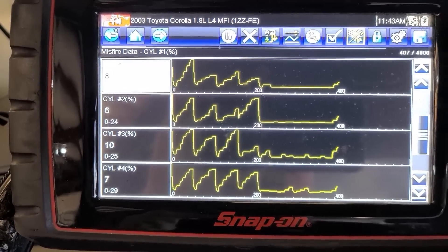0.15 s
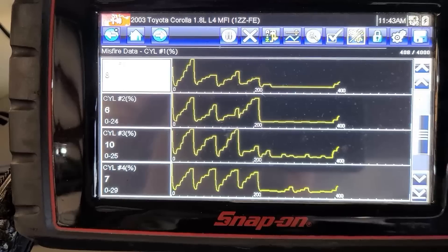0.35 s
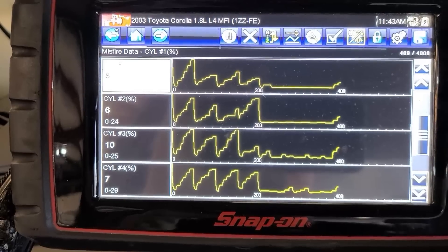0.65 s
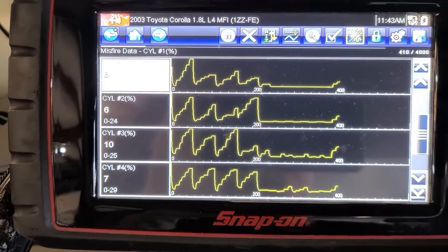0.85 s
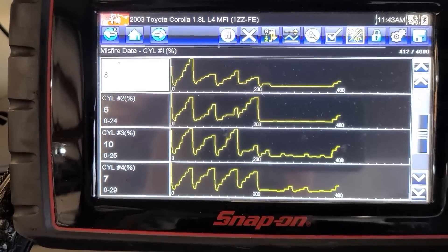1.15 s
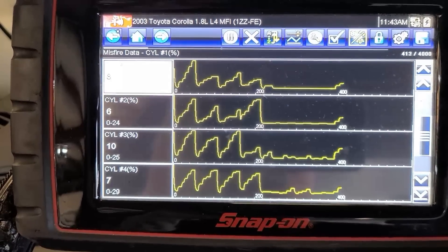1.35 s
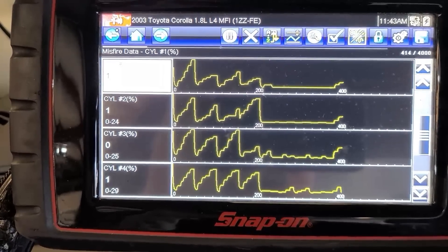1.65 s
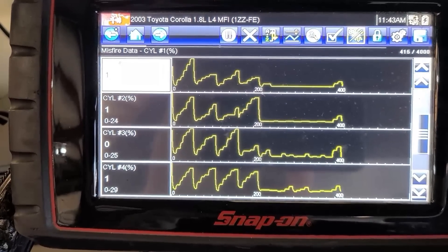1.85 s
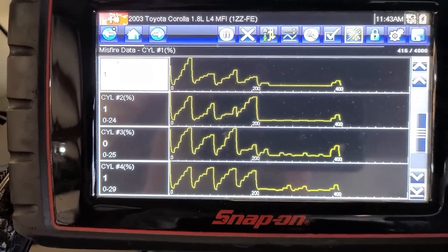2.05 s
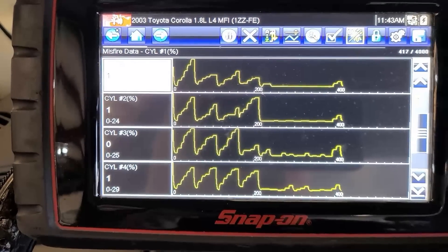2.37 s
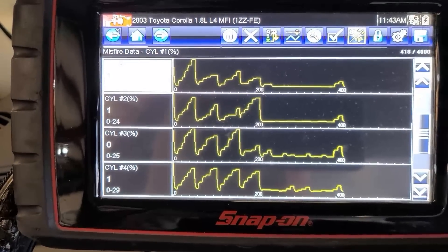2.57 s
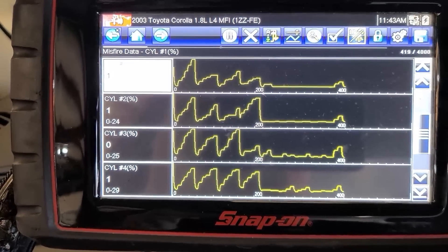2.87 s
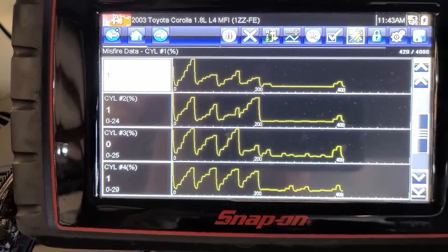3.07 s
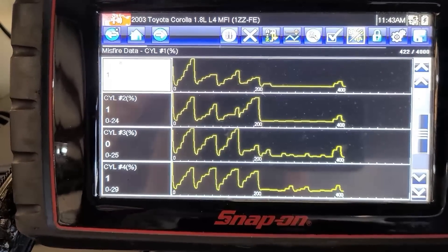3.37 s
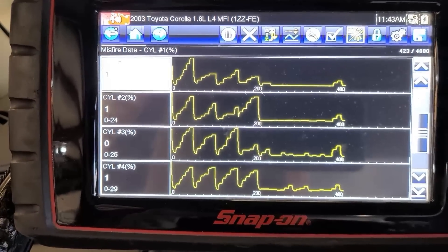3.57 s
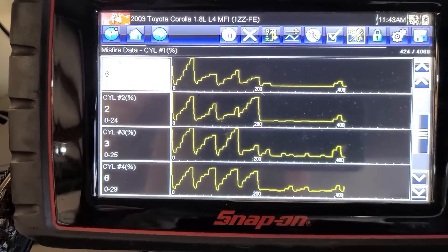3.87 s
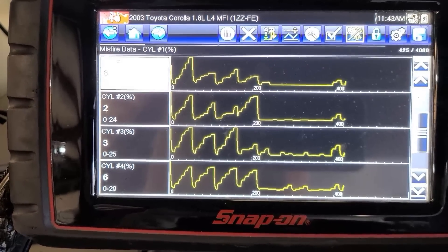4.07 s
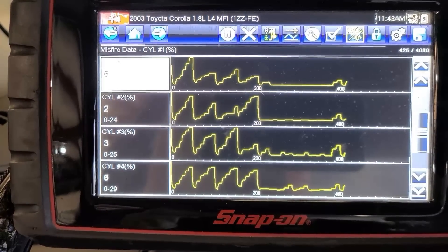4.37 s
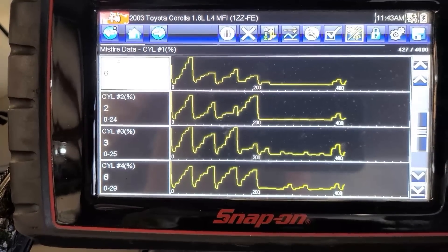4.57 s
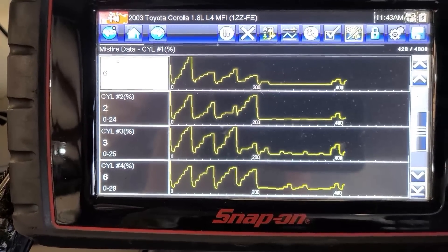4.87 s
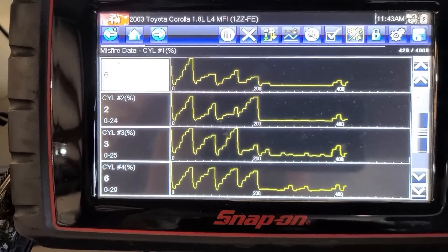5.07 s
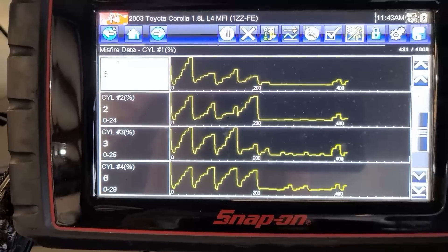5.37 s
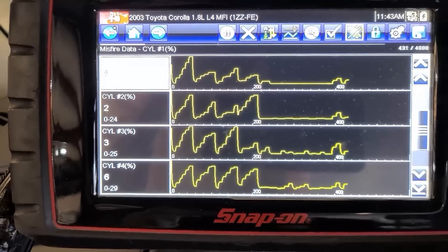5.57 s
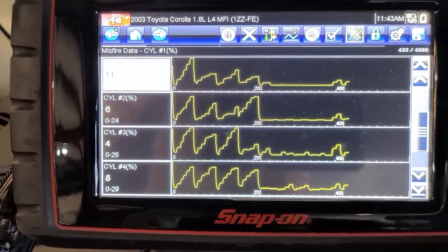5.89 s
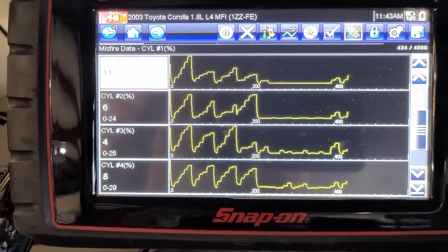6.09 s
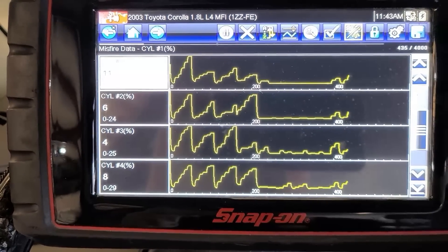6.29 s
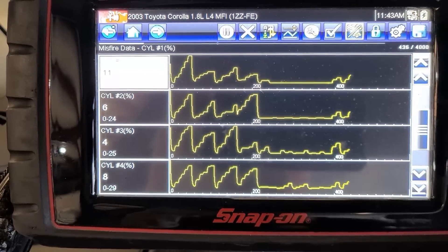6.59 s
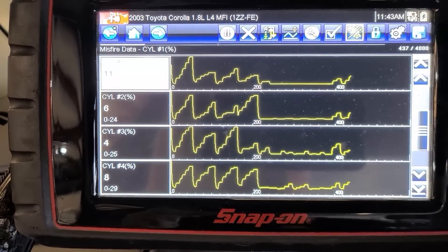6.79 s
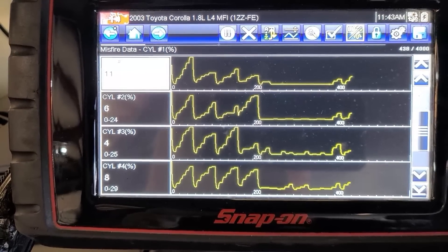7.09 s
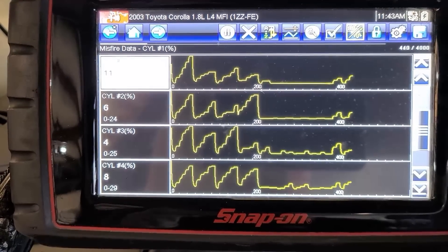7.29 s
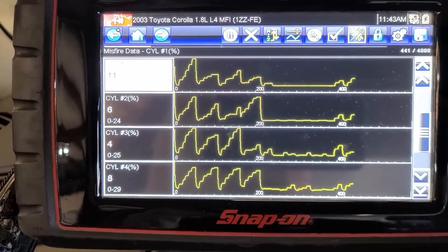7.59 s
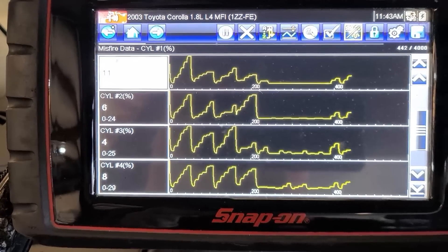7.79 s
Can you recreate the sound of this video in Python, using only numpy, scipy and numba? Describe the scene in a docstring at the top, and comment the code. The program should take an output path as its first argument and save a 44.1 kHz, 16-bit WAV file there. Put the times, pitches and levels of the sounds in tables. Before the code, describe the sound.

A four-cylinder car engine lopes at a low, rough idle, close by in a workshop, its uneven throb lying under a steady mechanical rush. A light knock and a brief scuff sound nearby. After a soft thud and a few pedal clicks, the engine revs up with a booming growl and intake hiss, sinks partway, and is revved again just after another thud.

```python
"""An engine idling and revved

A four-cylinder car engine lopes at a rough idle, close by in a workshop, and is then revved twice.
Periodic firing gives a booming note, and its uneven pulses excite the resonances of body and exhaust.
Valve gear and intake add broadband noise; a knock, a scuff, two thuds and pedal clicks sound nearby.
Of two microphone ports a hand apart, the left hears the treble first."""
import sys
import numpy as np
from scipy import signal
from scipy.fft import rfft, irfft
from scipy.io import wavfile
from scipy.ndimage import uniform_filter1d
from numba import njit

SR = 44100
rng = np.random.default_rng(int(sys.argv[2]) if len(sys.argv) > 2 else 0)


def to_wav(s):
    """Save 16-bit WAV."""
    ch = np.atleast_2d(s).T  # columns
    pcm = np.round(np.clip(ch, -1, 1) * 32767)  # PCM
    wavfile.write(sys.argv[1], SR, pcm.astype(np.int16))


N = 350154

# Noise spectra. Each row: frequency in Hz, relative spectral density in dB.
IDLE_SPECTRUM = [(24, -59.5), (40, 0), (60, -2), (91, -16.5), (151, -23), (203, -21), (319, -39),
                 (361, -33.5), (389, -36), (611, -39), (1390, -47), (2540, -45.5), (4510, -60),
                 (6730, -69.5), (9000, -68), (12000, -65), (14500, -74), (15800, -75)]
GEAR_SPECTRUM = [(530, -33), (900, -7), (1120, -3), (1420, -1), (2240, -3.5), (2460, 0), (5240, -22),
                 (6570, -33.5), (7500, -38.5), (11500, -31.5), (15800, -66)]
GROWL_SPECTRUM = [(60, -48), (110, -16), (210, 6.5), (260, -2), (566, -5), (780, -6), (1100, -11.5),
                  (1500, -47)]
HISS_SPECTRUM = [(4120, -5), (7000, -5), (7370, -3), (9250, -12), (12300, -1), (15000, -9), (15800, -18)]
PLATE_SPECTRUM = [(1500, -35), (2850, -6), (3300, -5), (3800, -10), (5200, -19), (6500, -11), (7600, -20.5),
                  (15000, -29)]  # air past the throttle plate
# Resonances. Each row: centre in Hz, width in Hz, gain in dB.
BAY_MODES = [(422, 12, 1.5), (516, 6.8, 3.5), (550, 12, -7.5), (764, 11, 8), (832, 7.5, 8), (1124, 33, 4),
             (1230, 207, 7.5), (1428, 14, 3.5), (1590, 80, 2), (1755, 17, 10), (1970, 4.7, 9),
             (2100, 8, 9.5), (2457, 23, 3.5), (4020, 28, 6.5), (6490, 2680, 15)]  # panels of the engine bay
WHIRR_MODES = [(64.7, 3.5, -1), (140.5, 20, 5.5), (1590, 130, 5), (2690, 39, 8.5), (3280, 1120, 5.5)]  # in the idle noise alone
PANEL_MODES = [(605, 480, 16), (843.4, 120, -3), (1140, 140, 9), (1430, 340, 8), (1700, 220, 5),
               (2600, 3100, -10)]
FLOOR_MODES = [(133, 39, 3), (242, 6.6, 10), (289, 41, 6), (363, 44, 1.5), (535, 450, -7.5),
               (950, 480, -14.5), (1400, 640, -19)]
PEDAL_MODES = [(800, 500, 5.5), (1450, 560, 17.5), (1860, 400, -3), (2700, 800, 6), (4380, 2000, -22),
               (6800, 2100, -7), (10800, 6800, -43)]
SCUFF_MODES = [(340, 70, -2), (557, 500, 1.5), (1168, 83, 5.5), (1410, 260, -1.5), (2380, 2300, -13),
               (10200, 2643, -36)]
BODY_MODES = [(55.2, 27, 6), (75.6, 54, 1.5), (103.6, 34, 9.5), (145.9, 15.7, 9), (180, 29, -2),
              (200.5, 32, -1.5), (281.8, 44, 0), (383.4, 13, -17.5), (430.7, 32, -14.5), (578, 73, -11)]  # body and exhaust
# Pitches that the room swallows. Each row: centre in Hz, width in Hz, gain in dB.
ROOM_NULLS = [(51.8, 6, -8), (64.6, 3.8, -6), (89.4, 5.3, -10), (105.6, 2.8, -7.5), (115.2, 2.75, -8.5)]
# Impacts. Each row: start in seconds, peak level in dB, seconds for the rattle to fall 60 dB.
KNOCKS = [(.932, -34.5, 0.47), (.951, -38.5, 0.43), (.962, -42, 0.45)]
THUDS = [(5.49, -26.5, 0.23), (7.215, -25, 0.17)]
PEDAL_CLICKS = [(5.532, -33.5, 0.028), (5.6171, -31, 0.024), (5.622, -29.5, 0.04), (5.678, -26, 0.038),
                (5.6847, -29.5, 0.066)]
# Strokes of a rub. Each row: start in seconds, level in dB.
SCUFF_STROKES = [(2.615, -36.5), (2.686, -40.5)]
# Throttle blips. Each row: opening time, time taken to open and shutting time, all in seconds.
BLIPS = [(5.64, 0.46, 6.2), (7.24, 0.18, 7.6)]
# Course of the engine. Each row: time in seconds, firing rate in Hz, base levels of note and ring in dB.
ENGINE_COURSE = [(0.0, 30.61, -29, -51), (2.1, 30.45, -35, -50.5), (2.4, 29.51, -32.5, -49.5),
                 (5.4, 29.23, -32, -52), (5.66, 32.94, -49, -36.5), (5.69, 35.5, -19.5, -32.5),
                 (5.77, 43.03, -16.5, -33), (5.86, 51.15, -24.5, -30.5), (5.97, 65.97, -24.5, -29),
                 (6.04, 74.88, -16, -27.5), (6.12, 92.2, -26, -21), (6.23, 112.9, -13.5, -26),
                 (6.35, 125.4, -13, -30), (6.46, 119.5, -15, -27), (6.55, 122, -17, -22.5),
                 (6.72, 108.9, -12.5, -31), (6.96, 88.65, -17, -26), (7.28, 66.44, -14.5, -33.5),
                 (7.38, 81.9, -18.5, -25.5), (7.5, 101.4, -17, -23), (7.65, 122.9, -11.5, -28),
                 (7.74, 121, -13, -25), (7.85, 113.1, -12.5, -21.5), (7.94, 110.6, -23.5, -28)]
# Surges of strong firings at idle. Each row: middle in seconds, level in dB, half width in seconds.
SURGES = [(.06, -27, 0.063), (.37, -31.5, 0.083), (0.669, -28, 0.039), (0.979, -29.5, 0.094),
          (1.3, -28, 0.062), (1.59, -26.5, 0.042), (1.88, -25.5, 0.046), (2.08, -35, 0.031),
          (2.208, -25, .045), (2.5, -28.5, 0.021), (2.8, -30.5, 0.055), (2.961, -34, 0.035),
          (3.13, -30.5, 0.065), (3.46, -30.5, .05), (3.8, -29.5, 0.055), (4.07, -30.5, 0.062),
          (4.3, -35, 0.02), (4.43, -31.5, 0.037), (4.671, -29, 0.056), (4.95, -34, 0.034), (5.06, -28, .04),
          (5.26, -37, 0.027), (5.39, -29, 0.05), (5.57, -29.5, 0.024)]
# Firing strength round the cycle. Each entry: one cylinder's offset in dB, before scaling by roughness.
CYLINDER_BALANCE = [-3.5, -3.5, -3, -8]
# The two ports. Each row: frequency in Hz, coherence from 0 to 1, left minus right level in dB.
PORT_RESPONSE = [(29.3, 0.98, -1.5), (60, 0.97, -0.5), (130, 0.98, -1.5), (292, 0.87, -1), (594, 0.52, -.4),
                 (970, 0.61, 1), (2000, 0.29, 3.5), (4000, 0.14, -0.2), (7000, 0.37, 3), (12000, 0.8, .5)]

# Noise laws: dB at FULL_HZ with the throttle shut, dB per octave of speed, dB per unit of opening.
GEAR_LAW, GROWL_LAW = (-29, 12.8, 1.76), (-33, 9.3, 4.6)
HISS_LAW, PLATE_LAW = (-67, 5.6, 20.7), (-49.5, 2.5, 9.8)
FULL_HZ = 120  # firing rate near the top of a rev
TIME, BIN_HZ = np.arange(N) / SR, np.arange(N // 2 + 1) * SR / N


def undb(db):
    """Amplitude grows tenfold for every 20 dB."""
    return 10 ** (np.asarray(db) / 20)


def level(x, db):
    """Scaling sets the rms level in dB."""
    return x * undb(db) / np.sqrt(np.mean(x ** 2))


def spectrum(table, column=1):
    """Interpolation along log frequency gives a value for each bin."""
    table = np.array(table)
    return np.interp(np.log(BIN_HZ + 1), np.log(table[:, 0]), table[:, column])


def peaks_db(hz, modes):
    """Lorentzian peaks and dips add in dB."""
    return sum(db / (1 + (2 * (hz - centre) / width) ** 2) for centre, width, db in modes)


def waver(rate_hz):
    """Random steps, smoothed twice, give a slow fluctuation with a spread near 1."""
    hold = int(SR / rate_hz)
    steps = np.repeat(rng.standard_normal(N // hold + 1), hold)
    return 1.3 * uniform_filter1d(uniform_filter1d(steps, hold), hold)[:N]


def noise(colour, modes=(), *, flicker_db, rate_hz):
    """Spectral shaping colours two independent noises, whose rms wavers about 1."""
    gain = undb(spectrum(colour) + peaks_db(BIN_HZ, modes))
    coloured = irfft(rfft(rng.standard_normal((2, N))) * gain, N)
    return level(coloured, 0) * undb(flicker_db * waver(rate_hz))


def ring(x, modes):
    """Modes superpose; each filters twice, so that the gaps between them stay dark."""
    out = 0
    for k, (hz, width, db) in enumerate(modes):
        peak = signal.iirpeak(hz, hz / width, fs=SR)
        out = out + (-1) ** k * undb(db) * signal.lfilter(*peak, signal.lfilter(*peak, x))
    return out


@njit
def highpass(x, hz, damping):
    """Two integrators in a loop form a high-pass filter whose edge can move."""
    high, band_state, low_state = np.empty(len(x)), 0., 0.
    for i in range(len(x)):
        g = np.tan(np.pi * hz[i] / SR)
        band = (band_state + g * (x[i] + 1e-18 - low_state)) / (1 + g * (g + damping))
        high[i] = x[i] - damping * band - low_state - g * band
        band_state, low_state = 2 * band - band_state, low_state + 2 * g * band
    return high


def ports(pair, lag_s=20 / SR, lag_from_hz=623, alike_hz=7400):
    """Partial coherence: the right port hears a share of the left sound, later, and a share of its own."""
    left, own = rfft(pair)
    top = 1 / (1 + (alike_hz / (BIN_HZ + 1)) ** 16)  # the highest band is alike and in step
    coherence = np.clip(spectrum(PORT_RESPONSE), 0, 1) * (1 - top) + .7 * top
    delay_s = lag_s / (1 + (lag_from_hz / (BIN_HZ + 1)) ** 3)  # the bass arrives together
    lag = np.exp(-2j * np.pi * BIN_HZ * delay_s) * (1 - top) + top
    right = coherence * left * lag + np.sqrt(1 - coherence ** 2) * own
    pan = undb(spectrum(PORT_RESPONSE, column=2) / 2)
    return irfft([left * pan, right / pan], N)


def surges():
    """Each surge has a Gaussian envelope, a time from its middle and a level."""
    middle, db, width = np.transpose(SURGES)[:, :, None]
    since = TIME - middle
    return np.exp(-.5 * (since / width) ** 2), since, db


def lope():
    """The surges, weighted by strength, sum to a slow modulation from 0 to about 1."""
    bell, _, db = surges()
    return np.sum(bell * np.minimum(undb(db - np.median(db)), 1), axis=0)


def rev_gain(hz, db, octave_db, open_db, fall_s=0.28):
    """Noise grows as a power of speed and with the throttle, which ramps open and relaxes shut."""
    opening = sum(np.clip((TIME - opens) / takes, 0, 1) ** .5
                  * np.exp(-np.maximum(TIME - shuts, 0) / fall_s) for opens, takes, shuts in BLIPS)
    return undb(db + octave_db * np.log2(hz / FULL_HZ) + open_db * opening)


def idle_noise(rush_db=-50.5):
    """Belts, fan and valve gear make a broadband rush; the lope modulates the rumble below it."""
    whole = noise(IDLE_SPECTRUM, BAY_MODES + WHIRR_MODES, flicker_db=.4, rate_hz=8)
    rush = signal.sosfiltfilt(signal.butter(2, 300, "high", fs=SR, output="sos"), whole)
    rumble = signal.sosfiltfilt(signal.butter(3, 50, "high", fs=SR, output="sos"), whole - rush)
    return (rush + rumble * undb(-5 + 11 * lope())) * undb(rush_db) / rush.std()


def impacts(table, modes, rattle):
    """An impulse and a decaying rattle excite the modes of the thing struck."""
    force, t = np.zeros((2, N)), np.arange(SR // 4) / SR
    for start, db, t60 in table:
        hit = rattle * rng.standard_normal((2, len(t))) * np.exp(-np.log(1000) * t / t60)
        hit[:, 0] += 1
        at = int(start * SR)
        force[:, at:at + len(t)] += undb(db) * hit
    return ring(force, modes) / np.abs(ring(signal.unit_impulse(N), modes)).max()


def scuff(rise_s=0.023, fall_s=.06, hum_hz=209.4, glide_hz_per_s=180, hum_db=-44, hum_s=.075):
    """Friction drives resonances in two gritty strokes, with a rising hum around the second."""
    grit = rng.standard_normal((2, N)) * undb(0.86 * waver(120))
    strokes = sum(undb(db) * np.clip((TIME - start) / rise_s, 0, 1)
                  * np.exp(-np.maximum(TIME - start, 0) / fall_s) for start, db in SCUFF_STROKES)
    t = TIME - SCUFF_STROKES[1][0]
    cycles = t * (hum_hz + glide_hz_per_s * t / 2)
    hum = np.sqrt(2) * undb(hum_db + waver(36)) * np.sin(2 * np.pi * cycles)
    return strokes * level(ring(grit, SCUFF_MODES), 0) + hum * np.exp(-(t / hum_s) ** 4)


def shake(cycles, revving, idle_db=-41, rev_db=-35.5):
    """Uneven cylinders rock the car: a low rumble with subharmonics of the firing note."""
    colour = [(10, -27), (21, -36), (30, 0), (45, 16.5), (62, 17), (140, -2.5), (200, -38), (500, -94)]
    rocking = noise(colour, flicker_db=1, rate_hz=5.4)
    rocking[0] += 0.12 * np.sin(np.pi * cycles)  # once a crank turn
    rocking[0] += 0.22 * np.sin(np.pi * cycles / 2)  # once a cam turn
    return rocking * undb(idle_db + (rev_db - idle_db) * revving)


def valve_gear(hz, late_s=0.071):
    """Rattle, filtered by the bay's resonances, builds and fades behind the engine speed."""
    late_hz = np.interp(TIME - late_s, TIME, hz)
    return noise(GEAR_SPECTRUM, BAY_MODES, flicker_db=.5, rate_hz=14) * rev_gain(late_hz, *GEAR_LAW)


def growl(hz, bark_db=7.5, late_s=0.029, width_s=0.0097):
    """Low noise, filtered by the bay's resonances, barks just after the throttle shuts."""
    since = TIME - np.array(BLIPS)[:, 2:] - late_s
    bark = undb(bark_db * np.sum(np.exp(-.5 * (since / width_s) ** 2), axis=0))
    return noise(GROWL_SPECTRUM, BAY_MODES, flicker_db=.8, rate_hz=12) * rev_gain(hz, *GROWL_LAW) * bark


def intake(hz):
    """Turbulent air hisses in the intake and past the throttle plate."""
    hiss = noise(HISS_SPECTRUM, flicker_db=.7, rate_hz=16) * rev_gain(hz, *HISS_LAW)
    suction = noise(PLATE_SPECTRUM, flicker_db=.7, rate_hz=30) * rev_gain(hz, *PLATE_LAW)
    return hiss + suction


def plate_whistle(hz=3400, width_hz=530, db=-47.5, swell_s=0.27):
    """Air past the opening plate whistles as narrow-band noise that swells and fades."""
    age = np.maximum(TIME - np.array(BLIPS)[:, :1], 0) / swell_s
    air = level(ring(rng.standard_normal((2, N)), [(hz, width_hz, 0)]), db)
    return air * np.sum(age * np.exp(1 - age), axis=0)


def body_ring(hz, cycles, ring_db, lope_db=4):
    """One uneven pulse a firing drives the modes of body and exhaust with its overtones."""
    at = np.flatnonzero(np.diff(np.floor(cycles)) > 0)
    rough = np.clip(30 / hz[at], 0, 1) ** 2  # combustion is ragged at idle, even at speed
    time_scatter, size_scatter = rng.standard_normal((1000, 2))[:len(at)].T
    late = (.05 * rough * time_scatter * SR / hz[at]).astype(int)
    size_db = np.resize(CYLINDER_BALANCE, len(at)) * (.3 + rough) + (1.3 + 1.2 * rough) * size_scatter
    pulses = np.zeros(N)
    pulses[np.clip(at + late, 0, N - 1)] = undb(size_db) / np.sqrt(hz[at])
    for _ in range(2):  # suppress the fundamental
        pulses = highpass(pulses, 1.64 * hz, 1.3)
    return undb(ring_db + lope_db * lope()) * level(ring(pulses, BODY_MODES), 0)


def firing_note(hz, cycles, note_db, flat_hz=2.67):
    """The fundamental lies at the firing rate and dips at room nulls; surges add a flatter tone."""
    note = undb(note_db + peaks_db(hz, ROOM_NULLS) + .9 * waver(16)) * np.sin(2 * np.pi * cycles)
    bell, since, db = surges()
    surging = undb(db) * bell * np.sin(2 * np.pi * (cycles - flat_hz * since))
    return np.sqrt(2) * (note + surging.sum(axis=0))


def scene(reflection_s=0.0024):
    """The sources superpose at the ports; the firings also reach the right one off a near panel."""
    times, *columns = np.transpose(ENGINE_COURSE)
    hz, note_db, ring_db = [np.interp(TIME, times, column) for column in columns]
    cycles = np.cumsum(hz) / SR  # one cycle a firing
    boom = body_ring(hz, cycles, ring_db) + firing_note(hz, cycles, note_db)
    reflected = np.pad(boom, (int(reflection_s * SR), 0))[:N]
    revving = np.clip((TIME - BLIPS[0][0]) / 0.081, 0, 1)  # on from the first blip
    puff = 1 + 0.045 * np.cos(2 * np.pi * cycles)
    running = puff * (idle_noise() + revving * (valve_gear(hz) + growl(hz) + intake(hz)))
    engine = np.array([boom, reflected]) + running + shake(cycles, revving) + plate_whistle()
    knocks = impacts(KNOCKS, PANEL_MODES, rattle=0.15)
    thuds = impacts(THUDS, FLOOR_MODES, rattle=0.1)
    clicks = impacts(PEDAL_CLICKS, PEDAL_MODES, rattle=0.2)
    return ports((engine + knocks + thuds + clicks + scuff()) * signal.windows.tukey(N, .002))


def record(dry):
    """A steep low-pass filter limits the bandwidth."""
    return signal.sosfilt(signal.ellip(14, .3, 70, 15930, fs=SR, output="sos"), dry)


dry = scene()
out = record(dry)
to_wav(out)
```